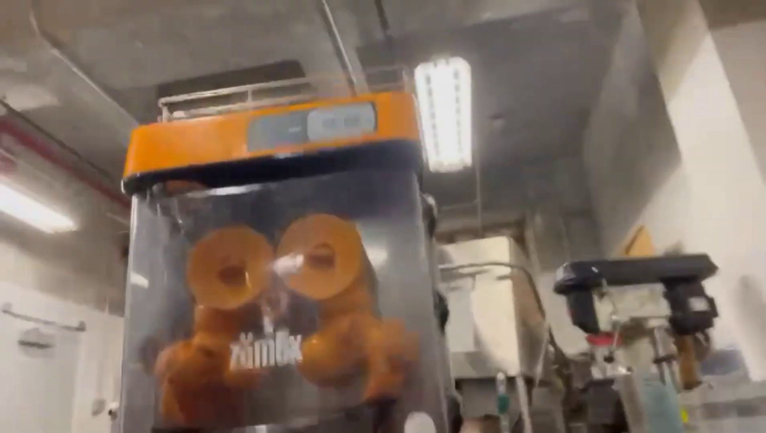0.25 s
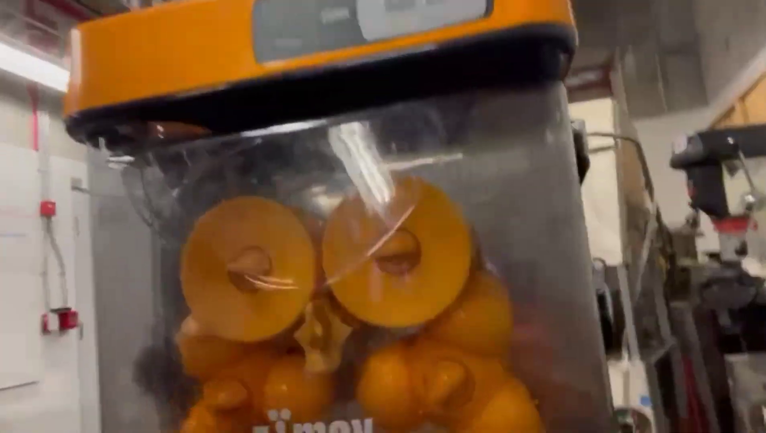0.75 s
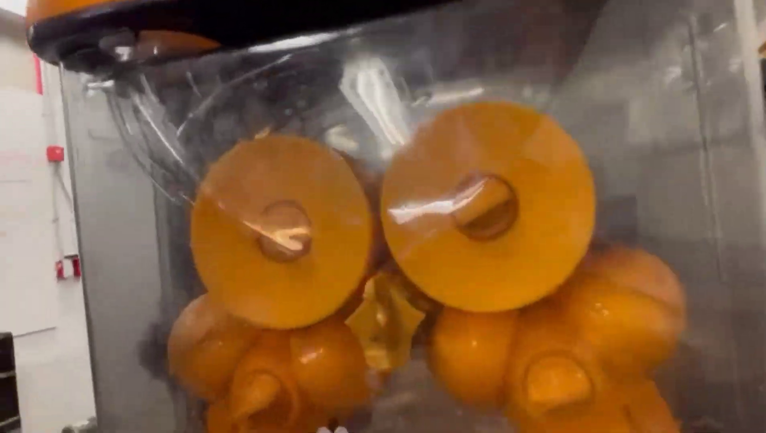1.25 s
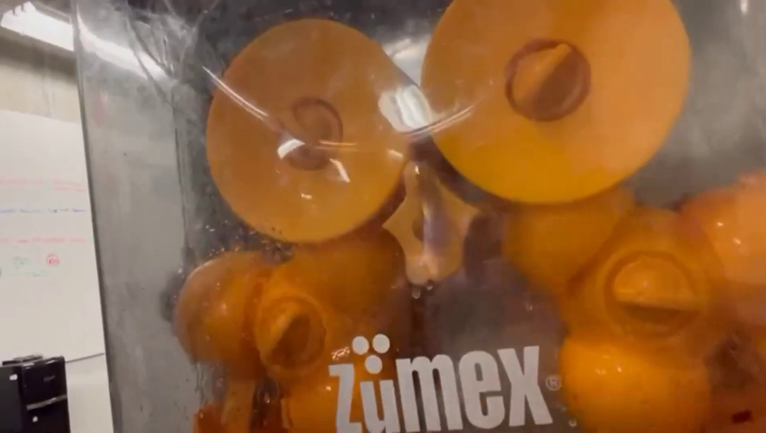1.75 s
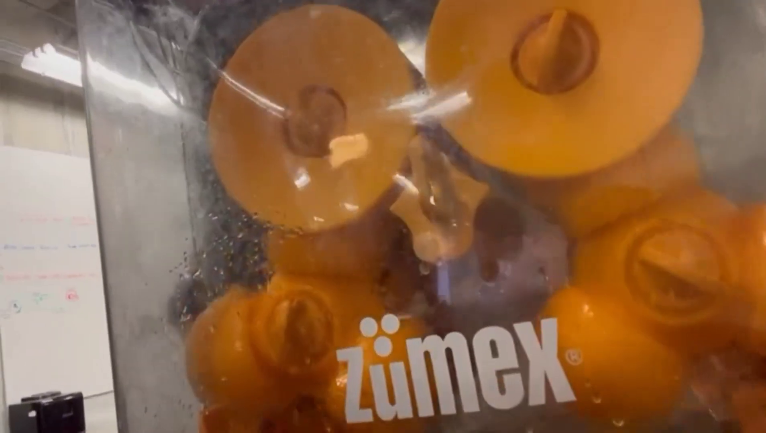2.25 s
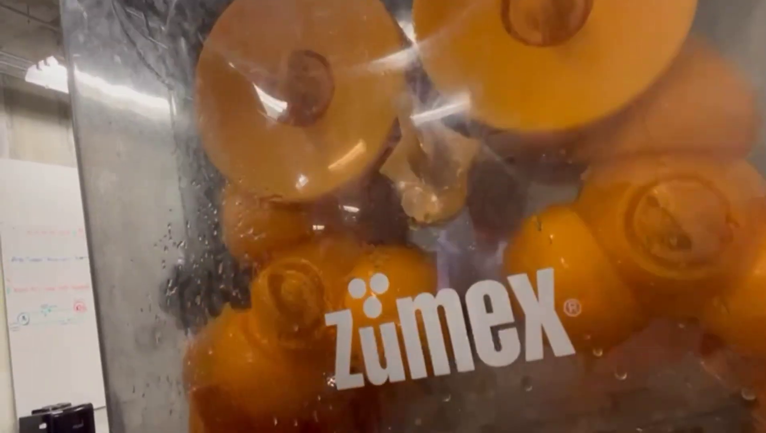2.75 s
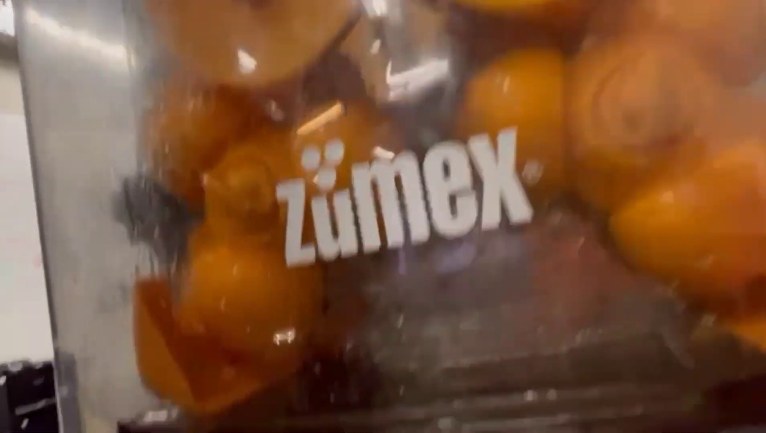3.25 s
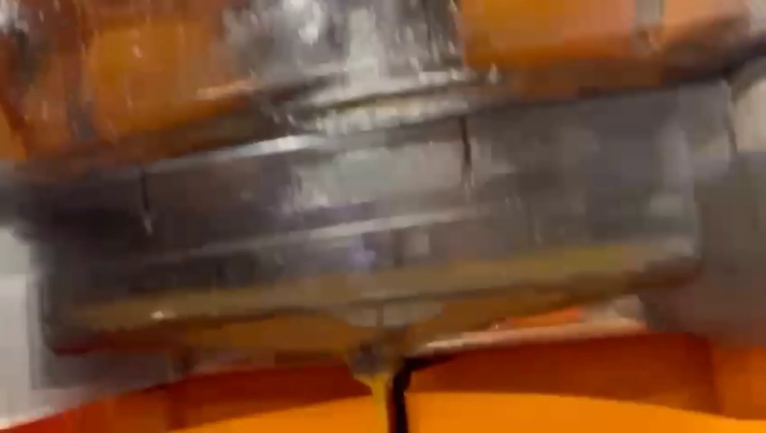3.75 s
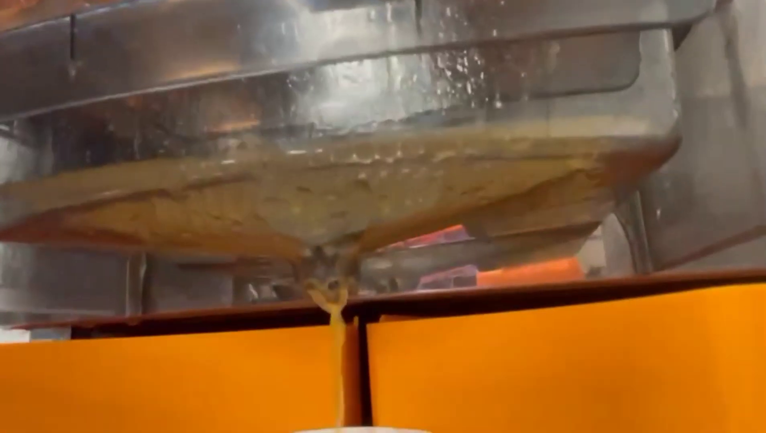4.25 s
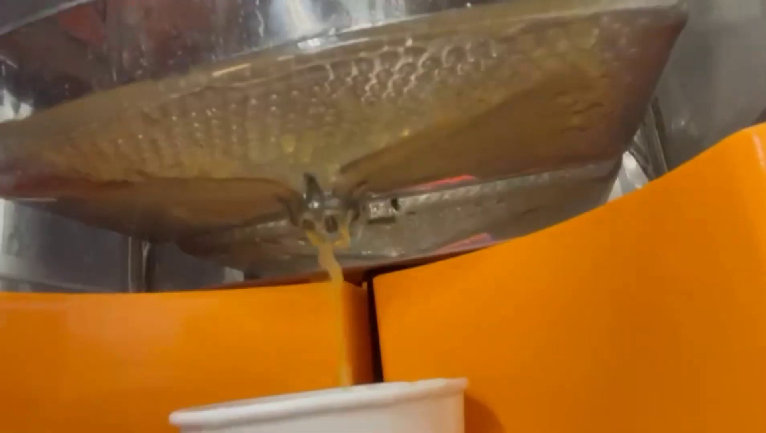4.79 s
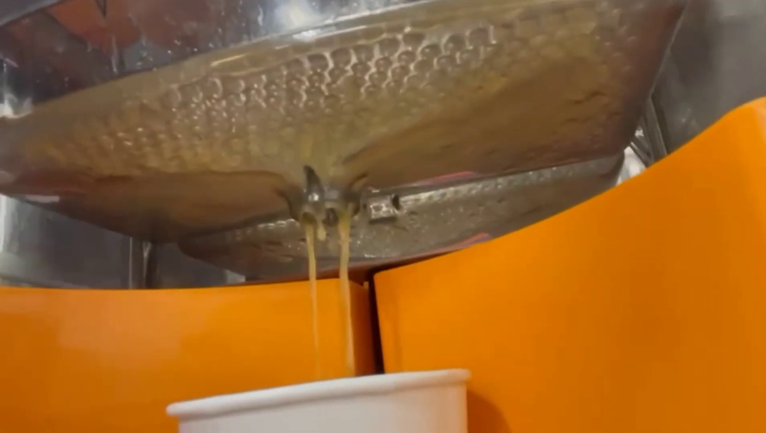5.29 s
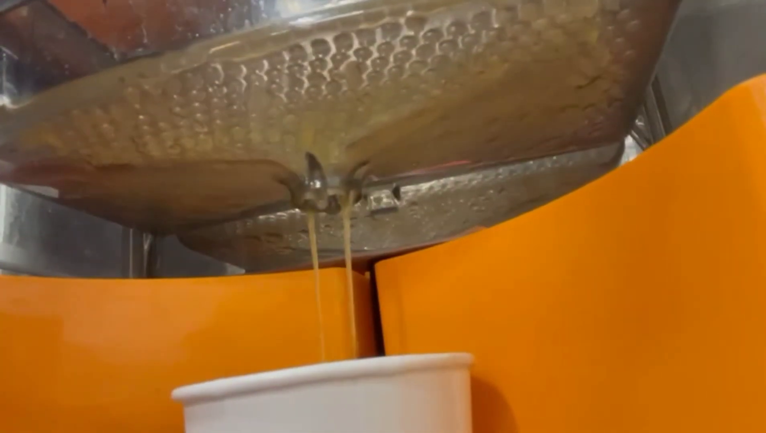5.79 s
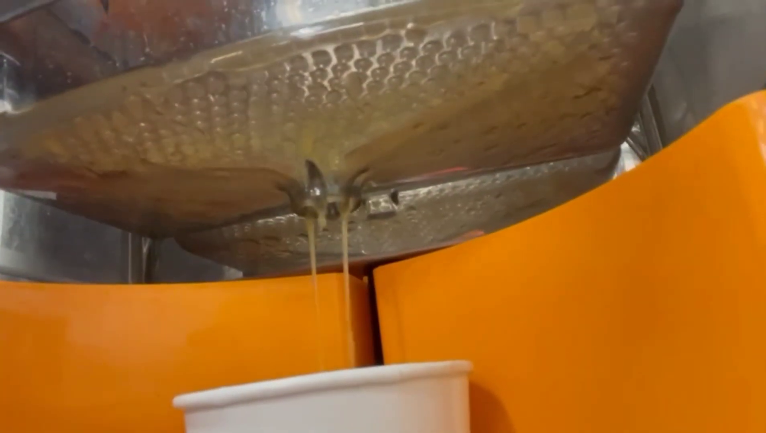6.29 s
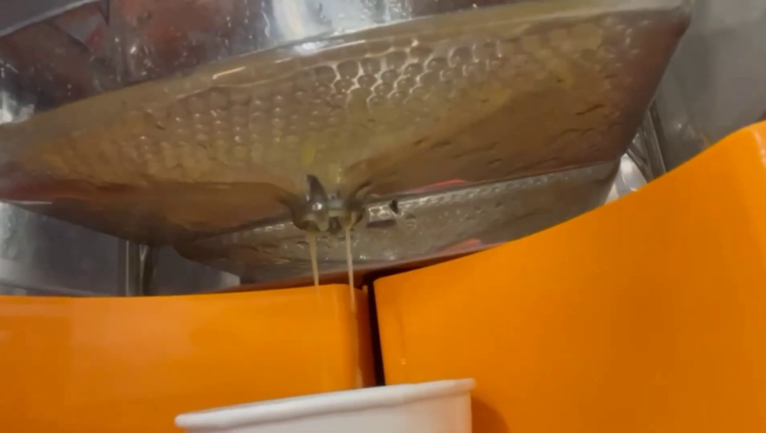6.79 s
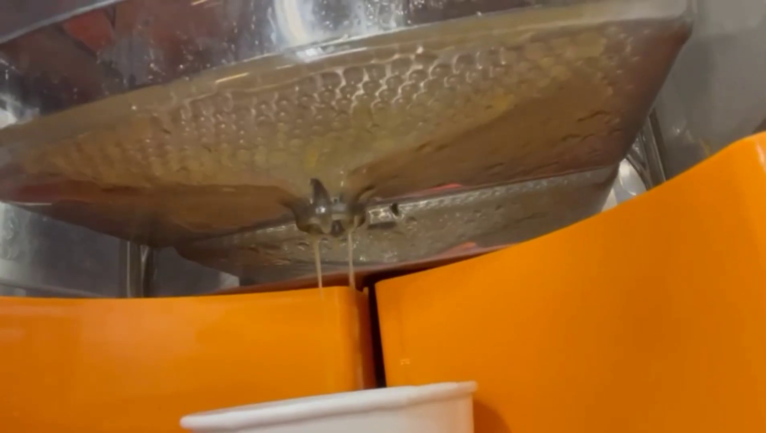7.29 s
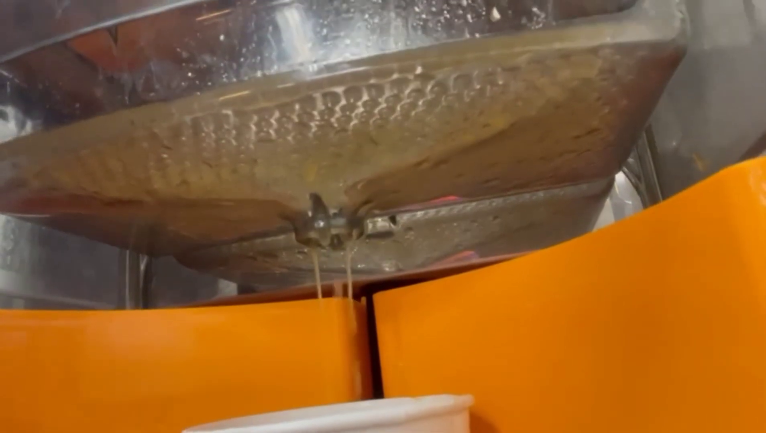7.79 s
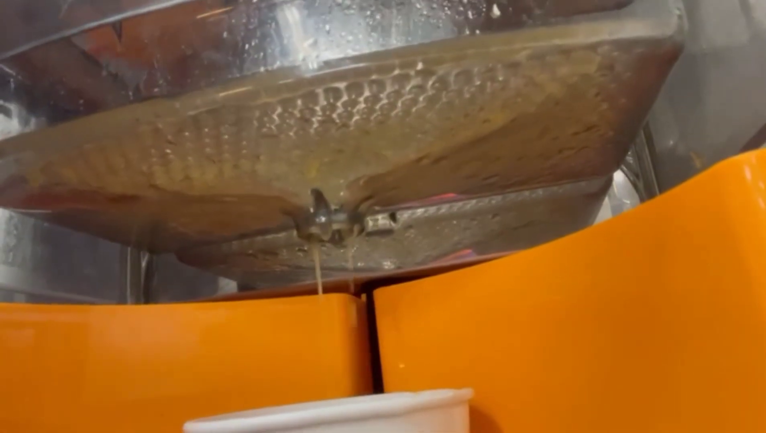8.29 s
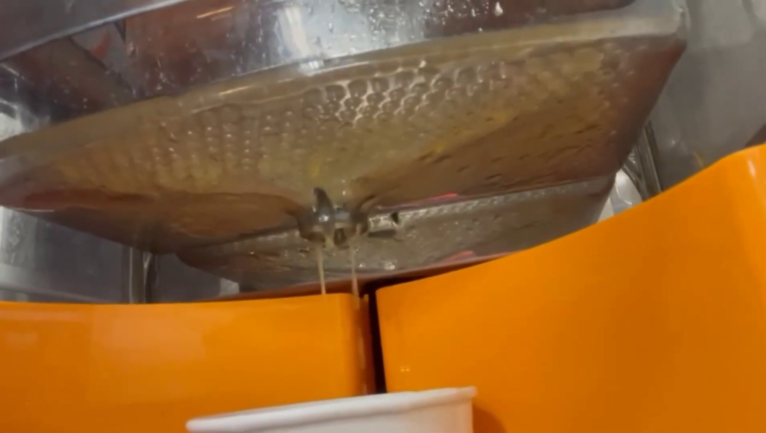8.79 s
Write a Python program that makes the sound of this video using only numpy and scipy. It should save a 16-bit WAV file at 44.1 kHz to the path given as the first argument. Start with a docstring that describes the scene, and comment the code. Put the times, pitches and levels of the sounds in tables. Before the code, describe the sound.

An automatic orange juicer runs throughout in a workshop, heard from close by. Its motor gives a loud, steady low hum. Over it sit a lumpy gear grind, fluttering mid-pitched gear tones, a drone from the casing, a purring high whine and a faint hiss. The gear tones are strongest in the first half second, then ease as the microphone nears the machine and the hum grows louder. Between about 3 and 5 seconds the microphone lowers to the spout; the hum swells further and the drone becomes hollower and wider. At about 5.5 seconds a piece of peel lands in the plastic bin with one short thud, slightly to the left, followed immediately by a very brief, high wet squeak. The machine then runs on evenly until the end at about 9 seconds.

```python
"""In a workshop, an automatic orange juicer runs; the listener walks to its window, then bends to the spout.
The gears grind, sing and make the casing drone, while the bearings and fan hiss. The motor whines as
the slots in its rotor pass the magnets, and hums at twice the mains frequency. About 5.5 s in, a piece
of peel drops with a thud, followed by a wet squeak."""
import sys
import numpy as np
from scipy.fft import rfft, irfft, next_fast_len
from scipy.io import wavfile
from scipy.ndimage import map_coordinates

SR = 44100
rng = np.random.default_rng(int(sys.argv[2]) if len(sys.argv) > 2 else 0)


def master_out(mix):
    """Clip the mix to full scale and print it as 16-bit PCM to the path in sys.argv[1]."""
    frames = np.transpose(np.atleast_2d(mix))
    ceiling = np.clip(frames, -1, 1)
    pcm = np.round(ceiling * 32767).astype(np.int16)
    wavfile.write(sys.argv[1], SR, pcm)


N = 398663

MAINS_HZ, SHAFT_HZ = 59.96, 26.616
AWAY, WINDOW, SPOUT = 0, 1, 2  # the listener's place: a step away, at the window, at the spout


def amp(db):
    """Turn decibels into a gain."""
    return 10 ** (np.asarray(db) / 20)


def unit(x):
    """Scale a signal to an average power of 1."""
    return x / np.sqrt(np.mean(np.abs(x) ** 2) + 1e-20)


def by_place(place, values):
    """Slide between three values, one for each place, as the listener moves."""
    return np.interp(place, [AWAY, WINDOW, SPOUT], values)


def wobble(rate):
    """A smooth random curve that passes through `rate` new values a second."""
    coarse = np.arange(0, N + 64, 64)
    knots = rng.standard_normal(int(N * rate / SR) + 4)
    return np.interp(np.arange(N), coarse, map_coordinates(knots, [coarse * rate / SR], mode="nearest"))


def panned(balance_db):
    """Left and right gains; a positive balance makes the left louder."""
    ratio = amp(np.atleast_1d(balance_db) / 2)
    pair = np.array([ratio, 1 / ratio])
    return pair / np.sqrt(np.mean(pair ** 2, axis=0))


def filtered(x, response):
    """Multiply each frequency in x by the gain response(hz)."""
    size = next_fast_len(N + 8192)
    return irfft(rfft(x, size) * response(np.fft.rfftfreq(size, 1 / SR)), size)[..., :N]


def rubbing(turns, repeat):
    """Friction noise; the share `repeat` comes back with every turn of the shaft."""
    size = int(SR / SHAFT_HZ)
    track = rng.standard_normal((2, size))
    looped = unit(np.array([map_coordinates(row, [turns % 1 * size], mode="grid-wrap") for row in track]))
    return np.sqrt(repeat) * looped + np.sqrt(1 - repeat) * rng.standard_normal((2, N))


def radiated(noise, table, place):
    """Give two noises the tone colour and stereo width heard at the window, then at the spout."""
    table_hz, window_db, spout_db, likeness, balance_db = np.transpose(table)

    def along(column, hz):
        return np.interp(np.log(hz + 1), np.log(table_hz + 1), column)

    def heard(db, node):
        def mid_side_gains(hz):
            # across a node (a still line on the casing) left and right move oppositely and sound hollow
            hollow = node * np.exp(-((hz - 682) / 150) ** 2)
            alike = (1 - hollow) * along(likeness, hz) - 0.96 * hollow
            angle = np.arccos(np.clip(alike, -1, 1)) / 2
            return np.array([np.cos(angle), np.sin(angle)])
        mid, side = filtered(noise, mid_side_gains)
        pair = np.array([mid + side, mid - side]) * np.sqrt(SR / 2)
        return filtered(pair, lambda hz: amp(along(db, hz)) * panned(along(balance_db, hz)))
    lowered = np.clip(place - WINDOW, 0, 1)
    return (1 - lowered) * heard(window_db, node=0) + lowered * heard(spout_db, node=0.82)


def gear_grind(turns, place):
    """Gear teeth rub; the load drifts as fruit is pressed, and uneven tooth loads make the grind lumpy."""
    # shape of the noise: f/Hz, window level/dB, spout level/dB, left-right likeness, balance/dB
    spectrum = [(19.9, -67, -63, 0.91, 0.5), (48, -55, -58, 0.76, 1), (89.5, -49.5, -48.5, 0.85, 8),
                (178, -55, -54.5, 0.86, -7), (247, -53, -50.5, 0.78, 1.5), (314, -54.5, -58, 0.58, 5.5),
                (380, -57.5, -57, -0.12, 3), (480, -57, -52.5, 0.28, -3), (564, -52, -53, -0.048, -1),
                (638, -55.5, -67, -0.63, 3), (770, -56.5, -61, -0.47, 1.5), (880, -64, -66.5, 0.46, -1),
                (1330, -60, -61, -0.2, 5), (1650, -62.5, -64.5, -0.33, 5), (2027, -70, -70.5, -0.0052, 1),
                (2800, -92, -89.5, 0.27, -4)]
    level_db = np.interp(place, [WINDOW, SPOUT], [-2.5, -1]) + .25 * wobble(1.7) + 1.63 * wobble(22)
    return radiated(rubbing(turns, repeat=0.086), spectrum, place) * amp(level_db)


def bearing_hiss(turns, place):
    """The bearings and the fan make a high hiss that partly repeats with each turn."""
    # shape of the noise: f/Hz, window level/dB, spout level/dB, left-right likeness, balance/dB
    spectrum = [(1700, -72.5, -81.5, 0.0064, 14.5), (2330, -68.5, -73.5, 0.24, 3),
                (3030, -72.5, -71.5, 0.03, 0), (3740, -73, -74, 0, 1), (3800, -68, -71.5, 0, 3),
                (4360, -79, -70, 0.015, 0.5), (4520, -72.5, -74, 0.013, 6), (5100, -76.5, -79.5, 0, 1.5),
                (5450, -78, -79.5, 0.9, 4), (6360, -75.5, -75.5, 0.8, -3), (7340, -80.5, -78.5, 0.7, -0.5),
                (7920, -71, -73.5, 0.9, -1), (8400, -74, -72.5, 0.9, 1.5), (9760, -81, -84, 0, 0)]
    level_db = np.interp(place, [AWAY, WINDOW], [-1.5, -.2])
    return radiated(rubbing(turns, repeat=0.22), spectrum, place) * amp(level_db)


def standing_waves(nodes_passed):
    """Room echoes make loud and quiet spots (nodes); moving through them shifts a tone's size and phase."""
    coarse = np.arange(0, N, 64)
    knots = rng.standard_normal((2, int(nodes_passed[-1]) + 4))
    real, imag = [map_coordinates(row, [nodes_passed[coarse]], mode="nearest") for row in knots]
    return np.interp(np.arange(N), coarse, unit(real + 1j * imag))


def flare_db(tone_hz, width_hz=270):
    """The tones near one pitch swell or fade for a moment."""
    # swells and fades: t/s, half length/s, level change/dB, f/Hz
    flares = [(.43, 0.04, 6, 4150), (.8, 1, 3.5, 5400), (1.2, 0.092, 1, 4230), (1.5, .45, 4.5, 4500),
              (1.6, 0.35, 6.5, 5070), (2.3, .2, 0, 4150), (2.75, .15, 7, 6450), (2.8, 0.41, -0.5, 5430),
              (2.95, 0.11, 2.5, 4150), (3.466, .056, 13, 6500), (3.9, .22, -8, 4380), (4.2, .22, -2, 4200),
              (4.2, 0.2, 4.5, 5500), (5.795, 1.0, 5, 5370), (5.9, .55, 5.5, 7840), (7.35, .15, 0.5, 4146),
              (8.2, 0.29, -3.5, 5600), (8.495, .6, -5, 7900)]
    t = np.linspace(0, N / SR, 1000)
    change_db = sum(db * np.exp(-((t - when) / length) ** 2 - ((tone_hz - hz) / width_hz) ** 2)
                    for when, length, db, hz in flares)
    return np.interp(np.arange(N) / SR, t, change_db)


def motor_whine(turns, mains, place, slots=12, slip=.0143, spread=4.3):
    """Rotor slots pass the magnets; the rotor lags the mains, splitting each tone into a purring cluster."""
    # magnetic tones: multiple of the slot rate, sideband (step within the cluster),
    # window level/dB, spout level/dB, balance/dB, left lead/rad
    slot_tones = [(7, -1, -55.0, -62.5, 5, -0.0), (7, 0, -54.5, -59.5, 4, 2.6),
                  (7, 1, -54.5, -53.5, 7, -2.6), (8, 1, -55.0, -64.0, 1, 0.7),
                  (9, 1, -60.0, -56.0, -3, -2.5), (12, -1, -51.5, -53.0, 5, -0.2),
                  (12, 1, -45.5, -50.5, 0, -1.3), (13, -1, -44.5, -41.0, 10, -1.1),
                  (13, 0, -48.0, -47.0, 2, -0.3), (13, 1, -42.0, -45.0, 4, -0.7),
                  (14, -1, -46.5, -62.0, 1, 0.1), (14, 1, -45.5, -49.0, -4, 1.7),
                  (14, 2, -55.5, -63.5, 0, -0.1), (15, -1, -52.0, -71.0, 3, -0.5),
                  (15, 1, -47.5, -52.0, -1, 0.2), (16, 1, -53.5, -54.5, 0, -0.4),
                  (17, -1, -48.5, -48.0, -4, 1.9), (17, 1, -49.5, -47.0, 3, -0.8),
                  (18, 1, -53.0, -57.5, -1, -0.9), (19, 1, -53.5, -51.0, -2, -0.8),
                  (19, 2, -57.0, -56.0, -3, -0.1), (20, -1, -53.5, -57.5, -1, 0.5),
                  (20, 1, -49.0, -53.0, -5, 0.1), (21, -1, -59.0, -57.0, 0, -0.0),
                  (25, -2, -58.5, -56.5, 0, 0.3), (25, 2, -52.5, -49.0, -1, 0.5),
                  (26, 2, -51.0, -48.5, 1, 0.8), (27, 2, -54.5, -50.0, 0, 1.1),
                  (28, 2, -59.5, -56.0, 0, 1.4), (29, 2, -61.0, -56.5, 0, 1.7)]
    # thin tones, likely from the bearings: f/Hz, window level/dB, spout level/dB, balance/dB, left lead/rad
    bearing_tones = [(2236, -54, -58, 2, 2.7), (2973, -59, -59, 0, -2.8), (3822, -54, -49, 3, 1.6),
                     (3857.4, -60, -56, 2, 2.1), (3940.2, -53, -53, 3, .7), (4010.2, -56, -56, 2, .5),
                     (4058.4, -51, -56, 2, 1.2), (4128.4, -54, -49.5, 2, -1), (4176.6, -49, -49.5, 2, .5),
                     (4246.6, -56, -63, 0, .1), (5525, -59, -59, 2, 2.7), (5548, -60, -60, 2, 1.1),
                     (6506, -57, -62, -3, -.1), (7144, -61, -60, 0, 0), (7782, -60, -57, 0, .2)]
    # added to every tone's level: away/dB, window/dB, spout/dB
    place_offsets = [-3.5, -0.4, -0.23]
    # depth of the shaft's flutter: at the window, at the spout
    flutter_depths = [.35, .12]
    # share of the power in standing waves: away, window, spout
    echo_shares = [.4, .2, .09]
    # quiet spots passed each second: away, window, spout
    node_rates = [26, 9, 5]
    place_db, echo_share = by_place(place, place_offsets), by_place(place, echo_shares)
    direct, reflected = np.sqrt(1 - echo_share), np.sqrt(echo_share)
    nodes_passed = np.cumsum(by_place(place, node_rates)) / SR
    lowered = np.clip(place - WINDOW, 0, 1)
    flutter_depth = np.interp(place, [WINDOW, SPOUT], flutter_depths)
    flutter_noise = unit(wobble(110) + 1j * wobble(110))

    def tone(hz, phase, flutter, window_db, spout_db, balance_db, lead):
        flicker = flutter * (direct + reflected * standing_waves(nodes_passed))
        level = amp(window_db + lowered * (spout_db - window_db) + place_db + flare_db(hz))
        phase = (phase + np.angle(flicker)) % (2 * np.pi)
        half_lead = (lead + spread * reflected * standing_waves(nodes_passed).real) / 2
        pair = np.sin(np.float32([phase + half_lead, phase - half_lead]))
        return np.sqrt(2) * panned(balance_db) * level * np.abs(flicker) * pair

    out = np.zeros((2, N))
    for multiple, sideband, *mix in slot_tones:
        per_turn = round(multiple) * slots
        # one cluster shares its starting phase and its flutter, so its beats stay crisp
        phase = 2 * np.pi * per_turn * turns + round(sideband) * (1 - slip) * mains + per_turn ** 2
        flutter = 1 + flutter_depth * np.roll(flutter_noise, per_turn * SR)
        out += tone(per_turn * SHAFT_HZ, phase, flutter, *mix)
    for hz, *mix in bearing_tones:
        phase = 2 * np.pi * (hz / SHAFT_HZ * turns + rng.uniform())
        out += tone(hz, phase, 1, *mix)
    return out


def gear_song(place, waver_db=2.16, drift_rad=.35):
    """Meshing teeth sing in clean tones; close pairs beat against each other as a regular flutter."""
    # tooth tones: f/Hz, away level/dB, window level/dB, spout level/dB,
    # left lead at the window/rad, left lead at the spout/rad
    tooth_tones = [(424.9, -55, -50, -49, .9, 2.5), (471.2, -43, -52, -42, -2.7, .9),
                   (489.7, -52, -52, -44, -2.9, 1.5), (529.9, -34, -48, -39, -1.8, 1.1),
                   (545.1, -28, -44, -36, -.7, 1.6), (556.2, -35, -54, -39.5, -.7, 2.4),
                   (577.7, -44, -39, -39.5, 2, 3.1), (589, -41, -41, -44, 1.8, 3.3),
                   (607.1, -52, -50, -56, .5, 2.6), (695.5, -33, -42, -53, -2.2, -3.1),
                   (709.1, -29, -44, -41, -.4, -3.2), (718.2, -35, -39, -41, 1.7, 3.2),
                   (813.4, -37, -42, -53, -1.3, -.8), (836, -53, -50, -60, 0, 0),
                   (1218.8, -53, -47, -58, -.7, -1.2), (1301, -55, -50, -45, -1, -.6),
                   (1336.7, -58, -50, -49, -2.3, -.4), (1418.2, -42, -44, -43, 1.1, 2.8),
                   (1637.7, -53, -49, -48, 3.1, .3), (1685.5, -50, -52, -47, -.2, .4)]
    out, t = np.zeros((2, N)), np.arange(N) / SR
    for hz, *levels_db, window_lead, spout_lead in tooth_tones:
        level = amp(by_place(place, levels_db) + waver_db * wobble(6.4))
        phase = 2 * np.pi * (hz * t + rng.uniform()) + drift_rad * wobble(3)
        half_lead = np.interp(place, [1.3, 1.9], [window_lead, spout_lead]) / 2  # shifts on the way down
        out += level * np.sin([phase + half_lead, phase - half_lead])
    return np.sqrt(2) * out


def casing_drone(place, diffuse=0.26, steady=0.73):
    """The gears keep the panels ringing in narrow bands, part steady and part restless."""
    # panel rings: f/Hz, width/Hz, away level/dB, window level/dB, spout level/dB, full left lead/rad
    panel_rings = [(52.9, 3, -44, -33.5, -34, -1.5), (146, 6, -43, -30, -32, 2),
                   (232.3, 20, -41.5, -36.5, -39.5, 0), (447, 4, -34, -46, -36, 0),
                   (539, 5, -26.5, -43, -33.5, 2.05), (1048, 35, -52.5, -41, -40.5, 1.5),
                   (1139, 35, -55, -34, -44.5, 3), (1306, 30, -46, -40, -39, -2)]
    out, t = np.zeros((2, N)), np.arange(N) / SR
    # at the spout, left and right lie across the panels' nodes, so the drone turns hollow and wide
    straddle = by_place(place, [.35, .6, 1])
    for hz, width, *levels_db, lead in panel_rings:
        rate = 1.5 * max(width, 1)
        ring = unit(steady + wobble(rate) + 1j * wobble(rate)) * np.exp(2j * np.pi * hz * t)
        level = amp(by_place(place, levels_db))
        apart = min(hz / 400, 1)  # long waves reach both sides alike
        shift = np.exp(.5j * apart * (lead * straddle + diffuse * wobble(rate)))
        out += np.sqrt(2) * level * np.array([(ring * shift).real, (ring / shift).real])
    return out


def motor_hum(mains, place, distance, at_metre_db=-24):
    """The iron core is pulled twice in each mains cycle: a low tone with faint, unsteady overtones."""
    # overtones: multiple of the mains, level against the main tone/dB
    overtones = [(4, -23), (6, -31.5), (8, -32), (10, -42)]
    # left-right balance: away/dB, window/dB, spout/dB
    balances = [0.5, -1.5, -2]
    dip_start_s, dip_end_s, ramp_s, dip_db = 1.58, 2.36, 0.11, -1.3  # the hum sags once
    t = np.arange(N) / SR
    dip = np.clip(np.minimum(t - dip_start_s, dip_end_s - t) / ramp_s, 0, 1)
    level = amp(at_metre_db + dip_db * dip + 0.23 * wobble(3.5)) / distance
    wave = np.sin(2 * mains)
    for multiple, db in overtones:
        wave += amp(db + 2.9 * wobble(2.7)) * np.sin(round(multiple) * mains + rng.uniform(0, 2 * np.pi))
    return np.sqrt(2) * level * panned(by_place(place, balances)) * wave


def peel_thud(attack_s=0.00071, right_delay_s=0.00043):
    """A piece of peel lands in the plastic bin, which rings briefly."""
    # the landing: t/s, level/dB
    landings = [(5.474, -11.5)]
    # the bin's ringing tones: f/Hz, relative level/dB, time to fade by 60 dB/s
    bin_tones = [(339, 4.5, 0.054), (456, -6, 0.037), (595, -1.5, 0.058), (790, -4.5, 0.038),
                 (1020, -11, .04), (5430, -21, .02)]
    out, t = np.zeros((2, N)), np.arange(N) / SR
    for when, db in landings:
        age = np.maximum(t - when, 0)
        ring = sum(amp(level - 60 * age / fade_s) * np.sin(2 * np.pi * hz * age)
                   for hz, level, fade_s in bin_tones)
        thud = amp(db) * ring * (1 - np.exp(-age / attack_s))
        out += panned(4.1) * np.array([thud, np.roll(thud, round(SR * right_delay_s))])
    return out


def peel_squeak(rise_s=.0022, fall_s=.0015):
    """Wet peel slips on the press with a very short rising squeak."""
    # the slip at its loudest: t/s, level/dB, f/Hz
    slips = [(5.5783, -16.5, 2930)]
    out, t = np.zeros(N), np.arange(N) / SR
    for when, db, hz in slips:
        age = np.clip(t - when, -.05, .05)
        swell = np.exp(-np.abs(age) / np.where(age < 0, rise_s, fall_s))
        out += amp(db) * swell * np.sin(2 * np.pi * hz * (age + 9 * age ** 2))
    return out


def scene():
    """The juicer runs throughout and the peel drops once; the listener's place sets the machine's mix."""
    # the listener's path: t/s, place (0 away, 1 window, 2 spout), distance from the motor/m
    path = [(0, 0.0042, 1.2), (.22, 0.061, .95), (.42, 0.7, 0.57), (1.3, 0.78, 0.42), (3.2, 1.25, 0.38),
            (4.2, 1.5, 0.32), (4.75, 2, 0.28)]
    t = np.arange(N) / SR
    times, places, distances = np.transpose(path)
    place, distance = np.interp(t, times, places), np.interp(t, times, distances)
    shaft_hz = SHAFT_HZ * (1 + 0.0002048 * wobble(2.5) + 0.000263 * wobble(22))
    turns = np.cumsum(shaft_hz) / SR
    mains = 2 * np.pi * MAINS_HZ * t  # phase of the electric supply
    noise = gear_grind(turns, place) + bearing_hiss(turns, place)
    whine = motor_whine(turns, mains, place)
    song = gear_song(place) * amp(-1.46)
    drone = casing_drone(place) * amp(-4.5)
    hum = motor_hum(mains, place, distance)
    return noise + whine + song + drone + hum + peel_thud() + peel_squeak()


def record(dry):
    """Soften the deepest bass and cut off the highest treble."""
    bass_hz, top_hz = 14, 9900
    return filtered(dry, lambda hz: (hz < top_hz) * hz ** 2 / (hz ** 2 + bass_hz ** 2))


dry = scene()
out = record(dry)
master_out(out)
```